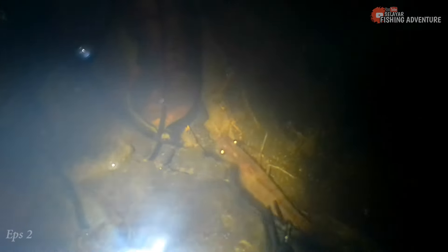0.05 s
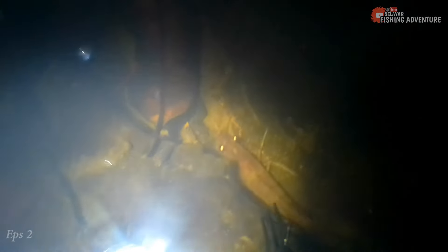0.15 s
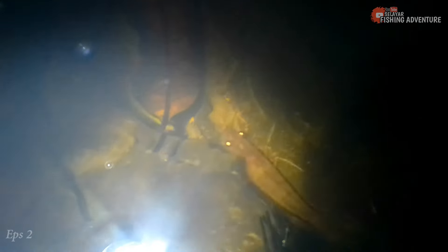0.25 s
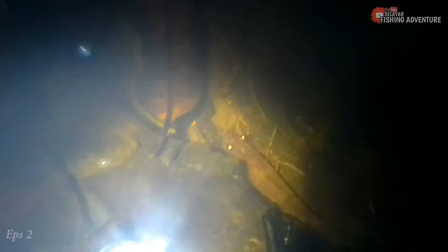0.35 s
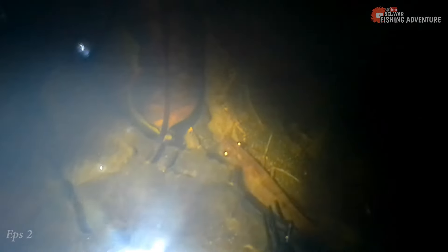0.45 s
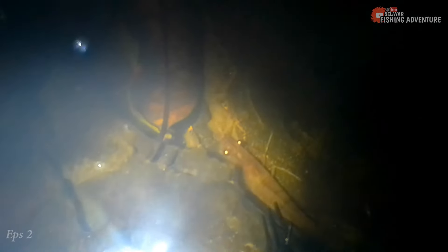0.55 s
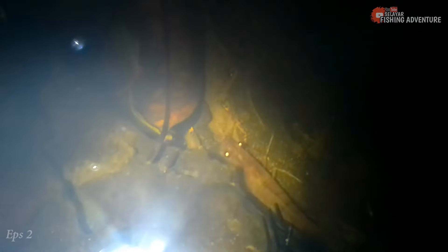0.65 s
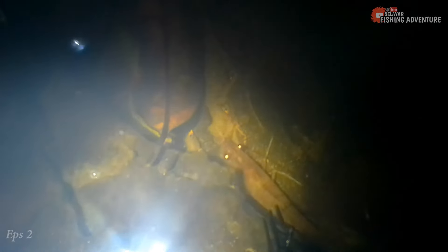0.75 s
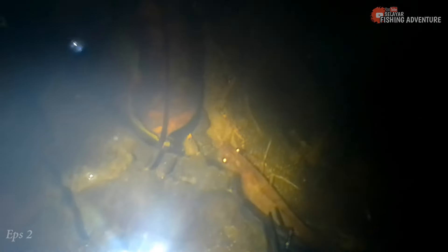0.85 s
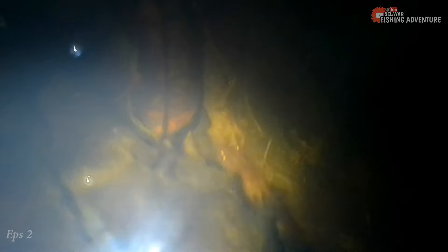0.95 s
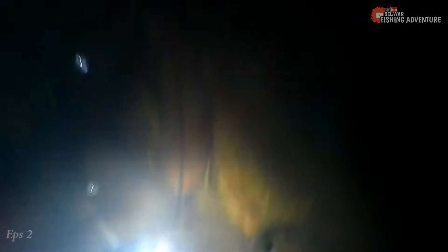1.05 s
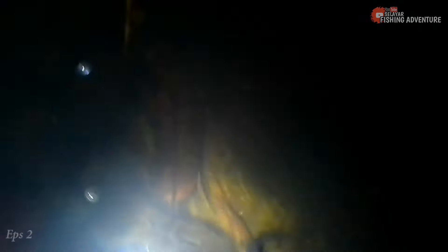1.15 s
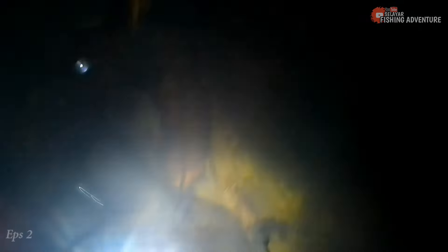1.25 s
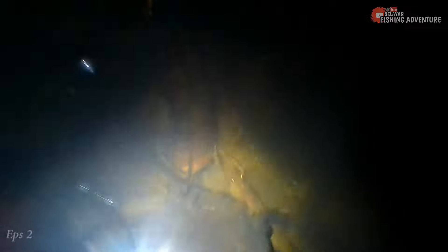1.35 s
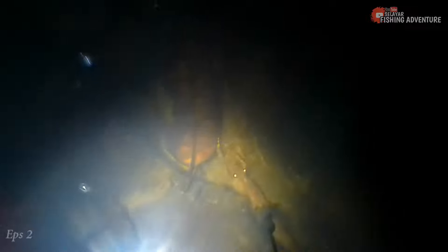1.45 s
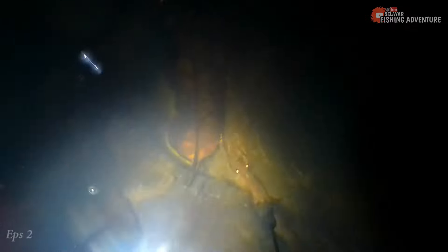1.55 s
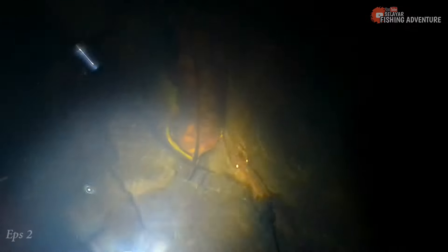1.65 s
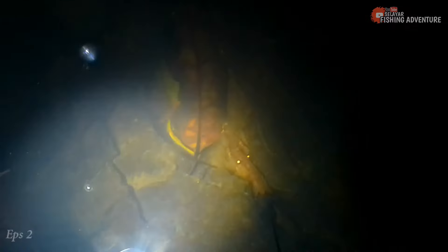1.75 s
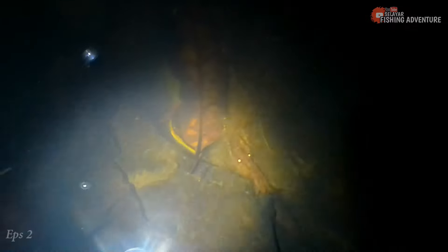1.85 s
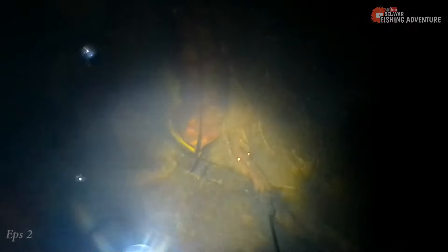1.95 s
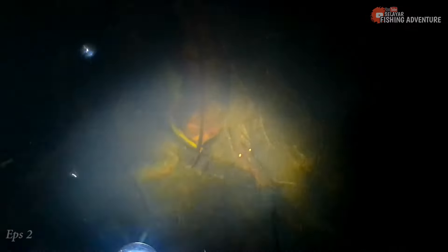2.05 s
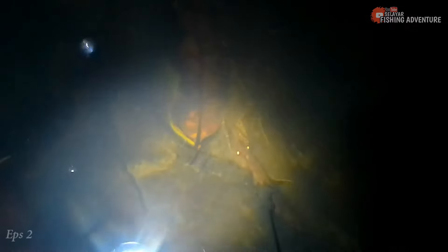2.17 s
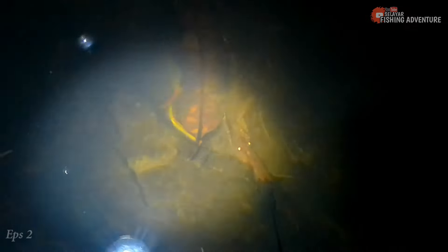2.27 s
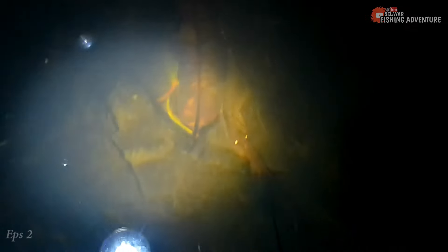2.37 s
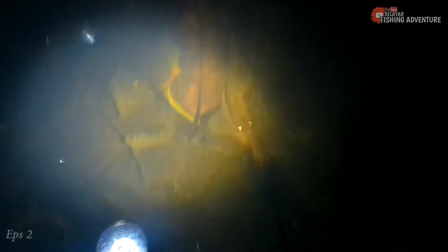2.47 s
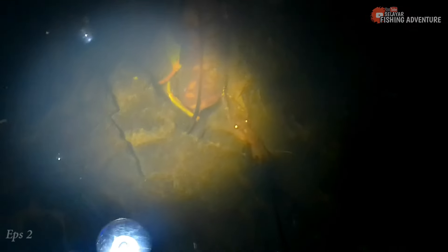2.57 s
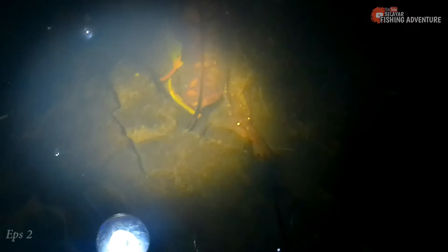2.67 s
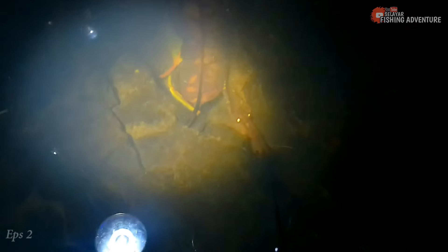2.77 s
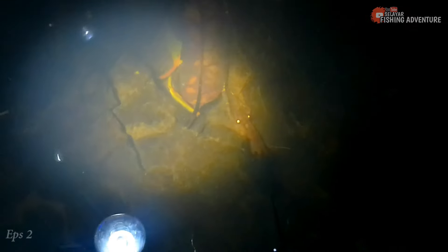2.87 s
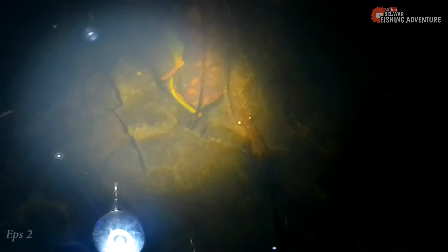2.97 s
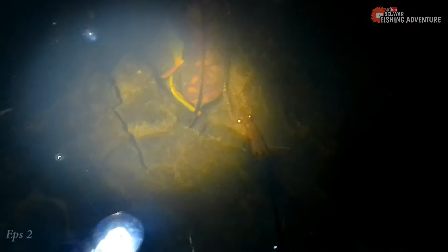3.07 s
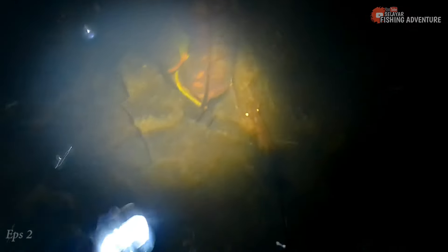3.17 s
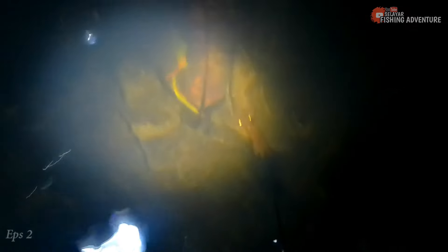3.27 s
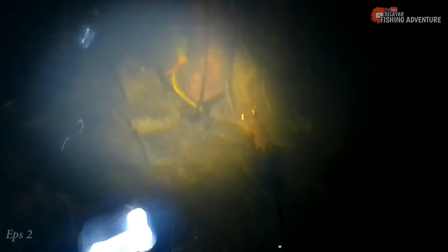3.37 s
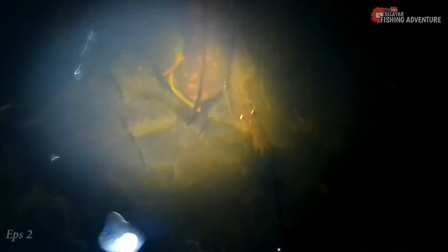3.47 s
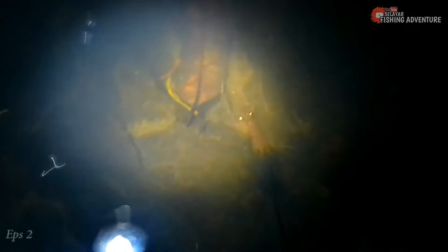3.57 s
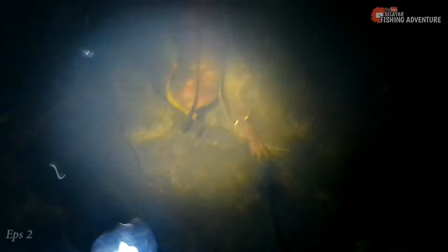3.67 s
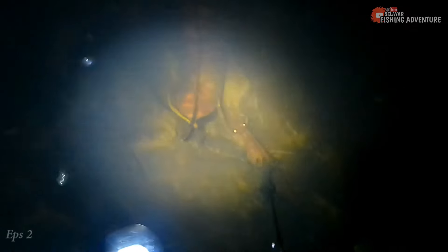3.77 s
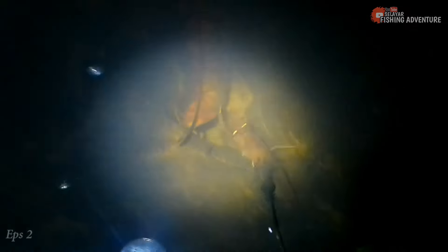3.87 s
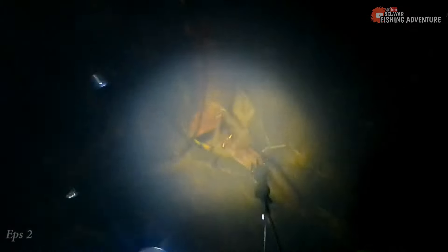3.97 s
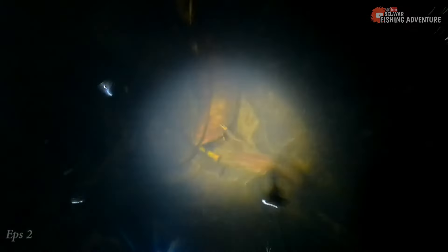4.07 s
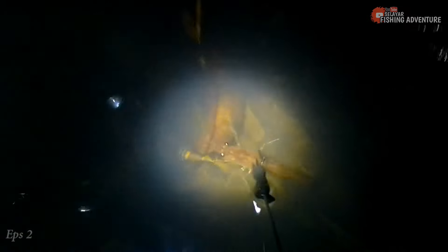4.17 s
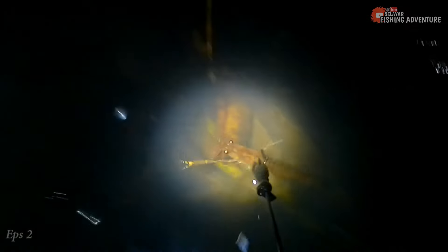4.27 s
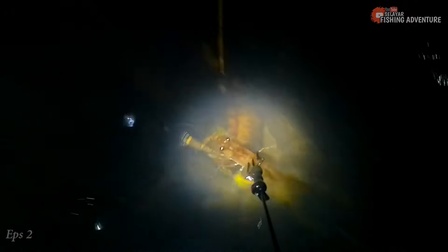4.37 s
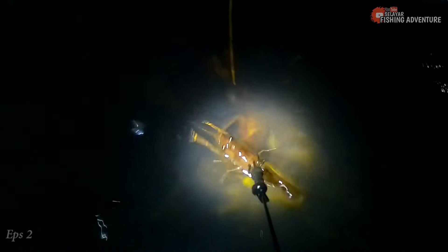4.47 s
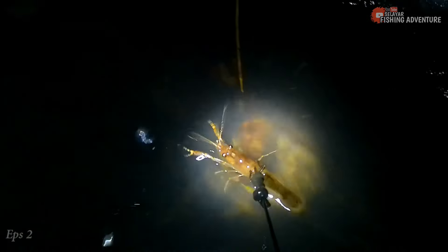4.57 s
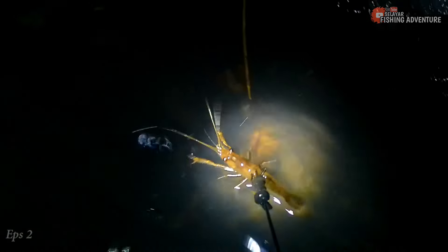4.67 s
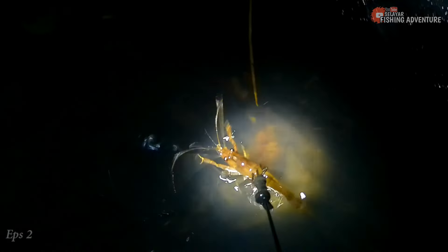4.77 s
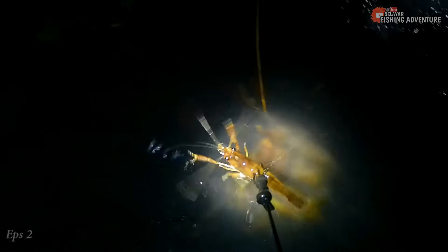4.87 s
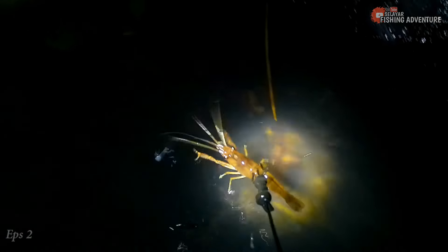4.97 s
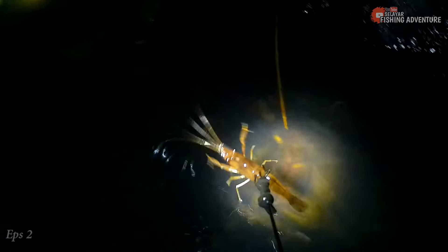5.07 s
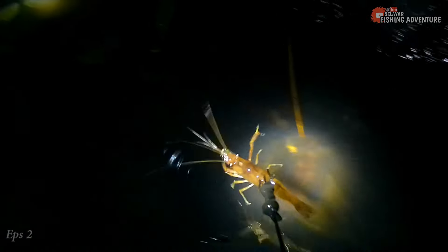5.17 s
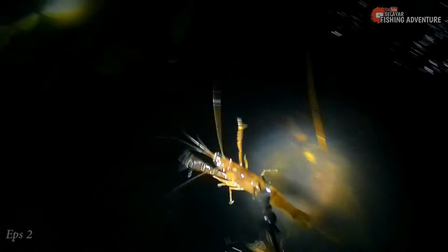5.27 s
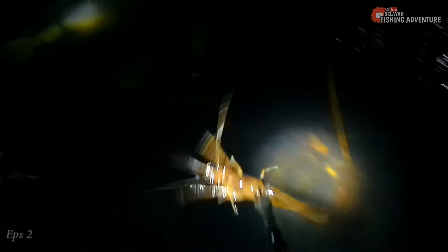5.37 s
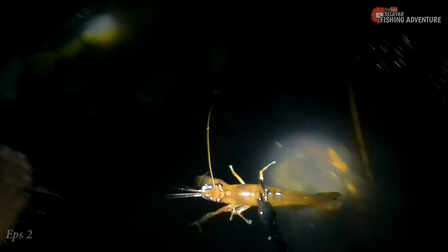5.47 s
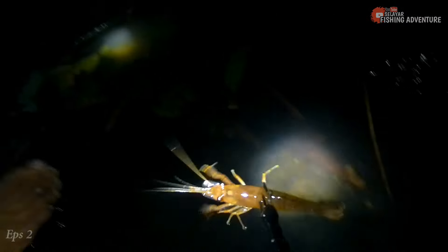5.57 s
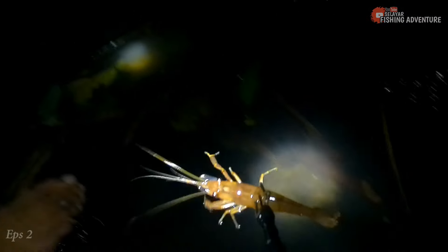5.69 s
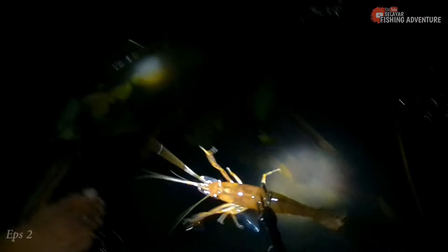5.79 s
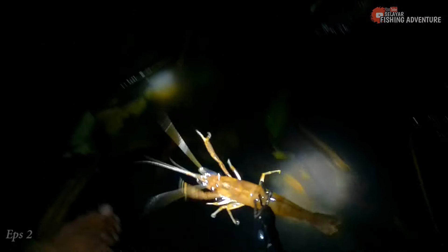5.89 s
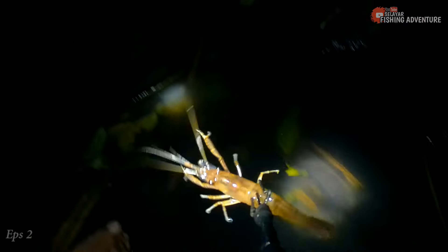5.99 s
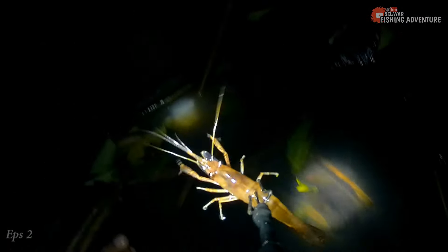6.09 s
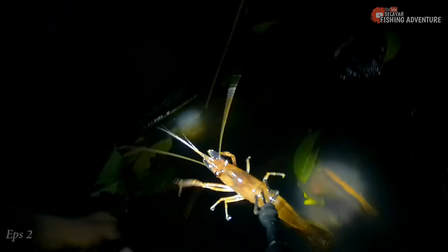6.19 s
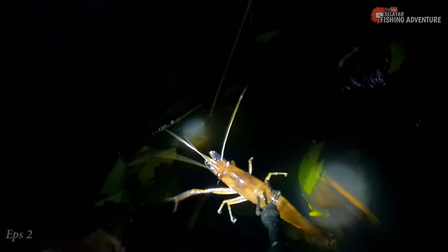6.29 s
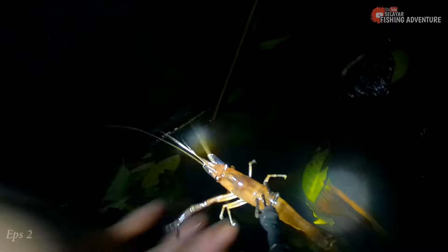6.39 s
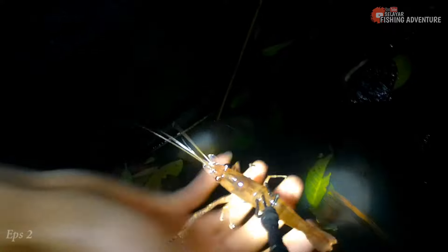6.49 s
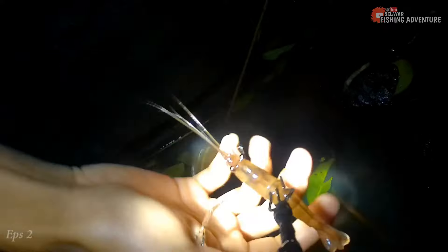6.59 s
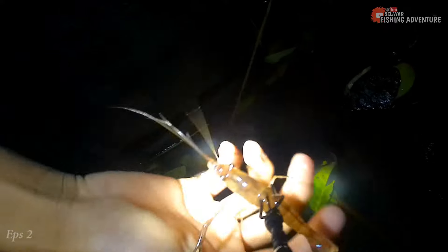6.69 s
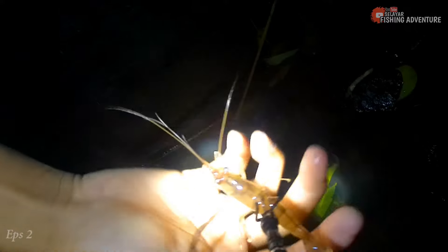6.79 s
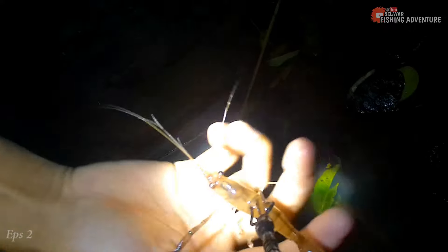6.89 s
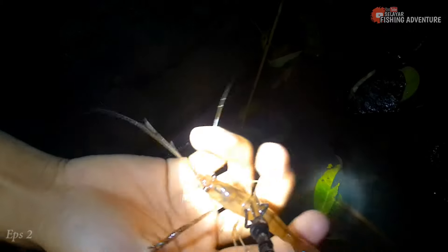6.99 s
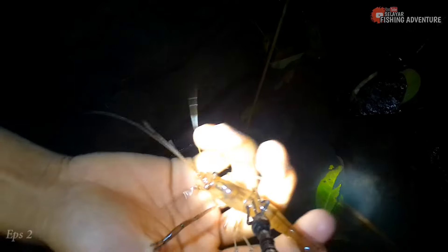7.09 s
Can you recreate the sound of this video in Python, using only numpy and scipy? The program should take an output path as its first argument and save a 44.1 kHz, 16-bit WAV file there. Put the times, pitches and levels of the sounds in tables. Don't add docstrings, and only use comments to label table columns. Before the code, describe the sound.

Night by a river, heard through a sealed plastic camera housing with the microphone inside. A couple of light hollow taps at 0.1 s, then a hush: very faint dull wash and tiny insect ticks about twenty a second. At 1.06 s a violent rattling knock, chattering for about 0.2 s, distorted, with a low thump. Soft sleeve rubbing from 1.4 to 1.8, small taps near 1.9, then a dense cluster of sharp knocks and rubs from 2.37 to 2.8 and more taps around 3.0. A second, duller rattling knock hits at 3.31 to 3.42. Lighter scrapes and isolated taps follow, clearest at 4.15, 4.23 and 5.09. A strong, gritty rub with hard clicks runs 5.2 to 5.6, then light taps near 5.8. Mostly ticks and a barely audible far squeak until 6.64, when a hard snap starts a flurry of finger taps to about 7.07.

```python
import sys
import numpy as np
from scipy import signal
from scipy.fft import rfft, irfft
from scipy.io import wavfile
from scipy.ndimage import uniform_filter1d

SR = 44100
rng = np.random.default_rng(int(sys.argv[2]) if len(sys.argv) > 2 else 0)


def store_wav(level_fs):
    pcm = np.round(np.clip(np.atleast_2d(level_fs), -1, 1) * 32767)
    wavfile.write(sys.argv[1], SR, pcm.T.astype(np.int16))


def invert_db(level):
    return 10 ** (np.asarray(level, dtype=float) / 20)


N = 314641

# f/Hz, width/Hz, level/dB
HOLLOW_MODES = [(377, 22, -3), (460, 45, -8), (540, 32, -3), (590, 55, -1), (655, 55, -5), (820, 70, -10)]
WALL_MODES = [(1100, 170, 1), (1230.4, 170, 2), (1480, 170, 4), (1744.4, 290, -1.5), (1946.8, 170, -0.5),
              (2404, 520, -20), (2750, 88, -23)]
EDGE_MODES = [(2300, 300, 9), (2680, 280, 8), (3200, 350, -6), (3750, 280, -2), (4250, 300, 0),
              (4720, 280, 0), (6400, 600, -15), (8700, 400, -35)]
# f/Hz, width/Hz, level/dB
THUD_MODES = [(125, 47, 0.0019), (223.53, 96, 0.0055)]

# start t/s, length/s, first level/dB, last level/dB, hollow above wall/dB
PALM_STROKES = [(.548, 0.0606, -70.5, -83, -6.5), (1.252, 0.02, -31.5, -50, -2),
                (1.27, 0.0379, -52, -54.5, 3.5), (1.31, .09, -64, -61, 4), (1.79, 0.06, -56, -80, 5),
                (1.94, .12, -59.5, -77.5, -0.5), (2.178, 0.1403, -58.5, -67.5, -6),
                (2.654, 0.0287, -30, -38, 0.5), (2.69, 0.0395, -62.5, -67.5, 3.5),
                (2.738, 0.0487, -36, -38, 1.5), (2.795, 0.0748, -43, -71.5, 1.5),
                (2.88, 0.0675, -70, -59, 1.5), (5.318, 0.065, -31, -33, -4), (5.385, .03, -36, -33, -3),
                (5.415, .04, -33, -32, -3), (5.457, 0.09, -32, -28, -4), (5.55, .075, -27.5, -43, -4.5),
                (5.686, 0.116, -78, -76, -5.5)]
FINGER_STROKES = [(.089, .006, -56, -48, -4), (.102, 0.0155, -37, -37, -6), (.12, 0.1564, -59, -97, 18),
                  (2.374, 0.0233, -41.5, -25.5, -3), (2.405, 0.0354, -46, -50, 0),
                  (2.448, 0.0843, -39, -42.5, -4), (2.548, 0.0347, -29, -31, -7),
                  (2.595, 0.0188, -36, -39.5, 5), (2.625, 0.0193, -35, -46.5, 5.5),
                  (3.07, 0.0218, -54, -55.5, 2), (3.15, 0.086, -57, -67, -10),
                  (2.958, 0.0213, -40, -48, -5.5), (3.005, 0.0593, -39.5, -59, 0),
                  (3.095, 0.0483, -42.5, -36, -2), (3.22, 0.089, -72, -46, -16),
                  (3.42, .03, -48, -51.5, -3), (3.454, 0.1303, -43, -49.5, 6),
                  (3.595, .14, -64.5, -60.5, 8), (3.75, 0.038, -57, -51, 3), (3.802, 0.0846, -41, -57, 3.5),
                  (3.914, .015, -57, -60, 5), (3.94, 0.112, -72, -60, 9), (4.146, .009, -56, -42, -8),
                  (4.224, .009, -58, -44, -8), (4.062, 0.00806, -36, -34, 0), (4.4, 0.135, -70, -69, 0),
                  (4.628, .032, -52, -56, 4), (4.996, 0.01225, -44, -46.5, 4.5),
                  (5.03, 0.0743, -44, -35.5, 0.5), (4.16, .02, -27, -45.5, -6),
                  (5.805, 0.128, -45.5, -45.5, -3.5)]
THUMB_STROKES = [(5.213, 0.1, -40, -32, -3), (6.781, 0.011, -39, -26, -15), (6.83, .008, -58, -42, -10),
                 (6.895, 0.0348, -37, -32, -8), (6.956, 0.062, -56, -67, -3), (7.053, 0.01, -40, -40, -5),
                 (7.066, 0.011, -39, -36, -5)]
SLEEVE_STROKES = [(1.408, .075, -51, -49, 4), (1.485, .065, -51, -58, 5), (1.56, .14, -56, -49, 4),
                  (1.715, .072, -51, -49, 4)]
PALM_GRIT_DB, FINGER_GRIT_DB, THUMB_GRIT_DB, SLEEVE_GRIT_DB = -18, -26.5, -32, -11
GRIT_GROWTH = .15
LAND_DB_PER_S, LIFT_DB_PER_S, HOLLOW_LIFT_DB_PER_S = 4000, 1500, 800

# t/s, peak level/dB, hollow above peak/dB, ring f/Hz
NAIL_TAPS = [(1.8347, -49, 1, 1347), (2.396, -10.5, -7.5, 1350), (2.618, -.5, -13.5, 1480),
             (3.001, -37.5, 10, 1310), (3.021, -21.5, -7, 1240), (5.3183, -6, -16.5, 1607),
             (5.3244, -11, -23, 1235), (5.4306, -17, -17, 1626), (5.5079, -15, -18.5, 1454),
             (5.547, -18, -17, 1498), (6.6455, -9, -25, 1250), (6.9561, -30, -2.5, 1850)]
TIP_TAPS = [(.0975, -20, -4, 567.6), (.1114, -26, -4.5, 1766), (1.924, -15, -4.5, 1364),
            (2.4947, -27, -23, 1572), (2.5157, -31, -18.5, 1650), (2.593, -18.5, -20, 1460),
            (2.6524, -13.5, -7, 1631), (3.1078, -30, -10.5, 1700), (3.1358, -28.5, -7, 1550),
            (5.8145, -30, -15, 1501), (5.848, -35, -12, 1700), (5.926, -34, -12.5, 1150),
            (3.584, -39, -13.5, 1600), (3.818, -32, -5, 1352), (3.9224, -49, 15, 1287),
            (4.1545, -14, -11, 1464), (4.6334, -34.5, -4, 1427), (5.0489, -30.5, -8.5, 1400),
            (5.0908, -17, -11.5, 1100), (6.1975, -26, -23.5, 1621), (6.2052, -27, -14.5, 1497),
            (6.638, -10, -14, 1426), (6.6604, -38, -10, 1400), (6.8997, -25, -12.5, 1518),
            (6.9127, -13.5, -15.5, 1453), (6.9262, -12.5, -15, 1592), (6.9844, -38.5, -10.5, 1540),
            (7.0394, -28, -12, 1516)]
PAD_TAPS = [(.1381, -35, 2.5, 1707), (1.9076, -45.5, 6, 1276), (2.5356, -19.5, -12, 1256),
            (2.575, -14.5, -11, 1190), (3.5493, -28.5, 3.5, 1442), (4.0602, -31, 1.5, 1256),
            (4.2338, -15, -11, 1223), (4.6643, -27.5, -1, 1604), (6.6822, -13, -28, 1281),
            (6.775, -21.5, -20, 1352), (6.7915, -11.5, -22, 1450), (6.8384, -9, -14.5, 1493),
            (6.8655, -31.5, -12.5, 1410), (6.9688, -29, -22, 1650), (7.007, -37, -19, 1639),
            (6.855, -42, -5.5, 1400)]
SKIN_CATCHES = [(5.256, -25, -10, 1570), (5.274, -24, -10, 1490), (5.304, -20, -10, 1150),
                (5.3295, -17, -18, 1400), (5.42, -23, -14, 1680), (5.4365, -17, -14, 1500),
                (5.447, -19, -14, 1450), (5.465, -20, -12, 1370), (5.483, -20, -12, 1380),
                (5.493, -19, -14, 1570), (5.521, -19, -14, 1400), (5.534, -17, -14, 1310),
                (5.6, -27, -10, 1180)]
# edge above peak/dB, press time/ms
NAIL_TOUCH, TIP_TOUCH, PAD_TOUCH = (-20.5, 0.939), (-38, 1.042), (-48, 1.3)
CATCH_TOUCH = (-30, 1.1)

# t/s, level/dB, held/s, time
# to lose 60 dB/s, hollow above level/dB
KNOCK_BLOWS = [(1.0644, 11, 0.03334, 0.0244, -9), (1.104, 1, 0.0089, 0.065, -12),
               (1.1195, 8, 0.0161, 0.03, -10), (1.141, -8, 0.0034, .03, -10), (1.15, -4, 0.0115, .04, -5),
               (1.1645, 7, 0.00534, .025, -9), (1.174, -12, 0.012, 0.029, 2.5),
               (1.2035, -1.5, 0.00182, .03, -10), (1.243, -5, 0.00095, .016, -9.5),
               (1.214, -20, 0.0105, 0.09, -4), (2.372, -38, 0.0368, 0.069, 17.5),
               (3.31, -10, .002, 0.02, -18), (3.3176, 1, 0.002, 0.009, -8), (3.3222, 8.5, 0.0105, .02, -2),
               (3.337, 6, 0.0061, 0.029, -9), (3.3494, 5, 0.0089, 0.02, -19.5),
               (3.363, -4, 0.0037, 0.028, -13), (3.372, -1, 0.00667, 0.0118, -13.5),
               (3.383, -18, 0.0132, 0.037, -2.5), (3.4022, -8, 0.006, .02, -10),
               (3.411, -6.5, 0.005, .014, -10)]
# t/s, f/Hz
GRIP_PATHS = [
    [(1.064, 1299), (1.078, 1149), (1.086, 1655), (1.105, 1591), (1.115, 1845), (1.126, 1506),
     (1.146, 1751), (1.17, 1300), (1.21, 1650)],
    [(1.243, 1100), (3.31, 1744), (3.33, 1526), (3.345, 1400), (3.355, 1677), (3.38, 1603), (3.402, 1199),
     (3.42, 1244)],
]
# t/s, peak level/dB, f/Hz, time to lose 60 dB/s
AIR_HUMS = [(.1, -30, 454.8, 0.195), (.1, -35.5, 373.2, 0.253), (1.925, -28, 610, 0.0689),
            (2.622, -21.5, 599, 0.106), (3.003, -26.5, 551.3, 0.0866), (3.133, -28, 379.9, 0.108),
            (3.548, -35, 559.3, .08), (3.925, -47, 380, .2), (4.02, -41.5, 380.2, 0.211),
            (4.158, -39, 366.6, 0.165), (4.236, -39, 389.5, 0.1145), (4.666, -33, 388.3, 0.095),
            (5.092, -33, 390.2, 0.0997), (6.957, -38, 558, 0.094)]
# t/s, peak level/dB, f/Hz, length/s
HARD_SNAPS = [(.0975, -15, 560, .0026), (3.4045, -1, 1240, .002), (3.4092, -1.5, 1370, .0018),
              (6.6433, .3, 1420, .0011)]
# t/s, level/dB, f/Hz, time to lose 60 dB/s
TINY_PING = (6.644, -54, 11000, .02)
# start t/s, length/s, level/dB, f/Hz
LIGHT_RASPS = [(3.25, .065, -50, 1230), (3.745, .055, -51, 1600), (3.965, .085, -60, 1150),
               (4.41, .12, -68, 1150), (4.46, .085, -67, 2000)]
RASP_WIDTH_HZ = 170

# widest swing t/s, level/dB, time to gain 60 dB/s, time to lose 60 dB/s, swing f/Hz
MOUNT_JOLTS = [(.108, -24.5, 0.04, 0.15, 54.74), (1.074, -13, 0.0268, .5, 74), (1.11, -13, 0.06, .5, 40),
               (1.186, -14, .14, 0.4253, 45), (1.5, -32.5, 0.7647, 0.28, 60), (1.682, -37, 0.12, .2, 53.97),
               (1.776, -25.5, 0.18, 0.2272, 68), (1.935, -32.5, 0.09, 0.3443, 51.92),
               (2.2, -54, 0.1, 1.12, 46), (2.415, -28.5, 0.1277, 0.26, 50.2), (2.599, -35, 0.26, 0.24, 43),
               (2.787, -29.5, 0.19, 0.1744, 39.99), (3.02, -47, 0.37, 0.63, 63),
               (3.157, -34, 0.43, 0.01, 50.99), (3.34, -29.5, .25, .5, 44.93),
               (3.435, -18.5, 0.2947, 0.1265, 41.07), (3.655, -43, 0.21, 0.28, 49),
               (3.8, -49.5, 0.04, 0.33, 55), (3.935, -33, 0.0929, 0.2655, 49),
               (4.09, -43, 0.13, 0.2, 53.03), (4.195, -23, 0.0574, 0.0774, 53.87),
               (5.03, -54, 0.18, 0.08, 50), (5.11, -36.5, 0.1335, 0.1431, 66.03),
               (5.4, -35, 0.4239, 0.62, 37), (5.46, -32.5, 0.3273, 0.28, 49.97),
               (5.55, -31.5, 0.44, 0.23, 67), (5.832, -37.5, 0.06, 0.19, 49.99),
               (5.91, -33.5, 0.19, 0.2131, 43), (6.645, -58, 0.23, 0.34, 100), (6.86, -61.5, .5, 1, 65),
               (4.32, -57, .2, .35, 50)]
# t/s, level/dB
CURRENT_TUG = [(0, -72), (.8, -72), (1, -67), (2.1, -72), (4.3, -68), (4.82, -70), (4.86, -78), (4.98, -78),
               (5.7, -70), (6.0, -71), (6.3, -74), (6.59, -75), (7.14, -77.5)]

# t/s, level/dB
INSECT_TICKS = [(.032, -62.5), (.183, -72.5), (.231, -64.5), (.2924, -61.5), (.3594, -60), (.4107, -66.5),
                (.452, -67.5), (.5023, -62), (.5487, -62.5), (.6042, -68), (.6671, -62), (.7317, -62.5),
                (.7714, -61.5), (.8381, -61.5), (.9059, -62.5), (.957, -63.5), (1.0123, -64), (6.0092, -67),
                (6.07, -73), (6.115, -67), (6.166, -72), (6.178, -63), (5.128, -70), (6.2443, -62.5),
                (6.2909, -65), (6.3451, -67.5), (6.4087, -62.5), (6.4553, -62), (6.5077, -65.5),
                (6.5543, -68), (6.604, -68.5), (6.7356, -64), (7.0195, -63), (7.1284, -71.5),
                (1.3072, -59), (1.3606, -57), (1.413, -61), (1.4584, -58), (1.5068, -60), (1.5666, -60),
              (1.62, -61), (1.856, -60), (1.9612, -62), (2.0116, -61), (2.068, -70), (2.1104, -66),
              (2.1633, -62), (2.2216, -62), (2.2805, -61), (2.3339, -66), (4.3217, -63), (4.3816, -73),
              (4.427, -64), (4.4773, -64), (4.5322, -60), (4.5841, -65), (4.7028, -64), (4.7522, -66),
              (4.8116, -65), (4.8545, -70), (4.9373, -66), (4.868, -67), (3.632, -64), (3.68, -66),
              (3.721, -66), (3.762, -64), (3.906, -67), (3.966, -63), (4.021, -67), (4.131, -68),
              (4.269, -65), (.0235, -70), (.281, -70), (.6555, -71), (.7665, -72)]
# first t/s, last t/s, gap/s, level/dB
TICK_RUNS = [(2.703, 2.94, .073, -62), (3.181, 3.24, .046, -67), (5.172, 5.2, .055, -64.5),
             (5.644, 5.8, .066, -75)]
TICK_SLOP_S, TICK_SPREAD_DB = .004, 3
# t/s, length/s, level/dB, f/Hz
FAR_SQUEAK = (6.47, .05, -66, 1400)
# f/Hz, level/dB per Hz
WASH_SPECTRUM = [(20, -93), (65, -106), (120, -104), (210, -108), (400, -114), (1300, -115), (2900, -133),
                 (4200, -129), (16000, -137)]

OFFSET, LOPSIDED = .0005, .045


def evened(x):
    return x / np.sqrt(np.mean(x ** 2) + 1e-30)


def peaked(x):
    return x / (abs(x).max() + 1e-30)


def add(mix, s, sound):
    part = mix[round(s * SR):][:len(sound)]
    part += sound[:len(part)]


def dulled(x, hz=5200):
    return signal.sosfilt(signal.butter(6, min(hz, 9000), fs=SR, output="sos"), x)


def resonate(x, hz, width):
    pole = np.exp((2j * np.pi * hz - np.pi * 1.55 * width) / SR)
    for _ in range(2):
        x = signal.lfilter([1 - abs(pole)], [1, -pole], x)
    return 2 * x.real


def ring(x, modes):
    return sum((-1) ** k * invert_db(db) * resonate(x, hz, width) for k, (hz, width, db) in enumerate(modes))


def wandering(x, modes, lumpy_db):
    coarse = rng.standard_normal((len(modes), len(x) // 50 + 1))
    coarse = uniform_filter1d(uniform_filter1d(coarse, size=10), size=10)
    lumps = uniform_filter1d(np.repeat(coarse, 50, axis=1)[:, :len(x)], size=50)
    out = np.zeros(len(x))
    for k, (mode, lump) in enumerate(zip(modes, lumps)):
        out += (-1) ** k * invert_db(lumpy_db * evened(lump)) * ring(x, [mode])
    return out


def sliding(x, hz, width):
    turn = np.exp(2j * np.pi * np.cumsum(hz) / SR)
    r = np.exp(-np.pi * width / SR)
    return 2 * (turn * signal.lfilter([(1 - r) ** 2], [1, -2 * r, r * r], x / turn)).real


def slips(size, per_s, spread_db, smooth):
    draw = rng.random((size, 2))
    strength = invert_db(spread_db * np.minimum(-np.log(draw[:, 0] + 1e-12), 4))
    slip = strength * (draw[:, 1] < per_s / SR)
    burst = signal.lfilter([1], [1, -.97], slip)
    return rng.standard_normal(size) * (smooth + evened(burst))


def rubs():
    drive = dulled(slips(N, per_s=300, spread_db=-1.0, smooth=0.7), 6100)
    wall = evened(dulled(wandering(drive, WALL_MODES, lumpy_db=3.5), 2800))
    hollow = evened(dulled(wandering(drive, HOLLOW_MODES, lumpy_db=3.5), 2800))
    hiss = dulled(slips(N, per_s=470, spread_db=2.5, smooth=2.5), 8800)
    edge = evened(wandering(hiss, EDGE_MODES, lumpy_db=4.0))
    out = np.zeros(N)
    for strokes, grit_db in ((PALM_STROKES, PALM_GRIT_DB), (FINGER_STROKES, FINGER_GRIT_DB),
                             (THUMB_STROKES, THUMB_GRIT_DB), (SLEEVE_STROKES, SLEEVE_GRIT_DB)):
        for s, length, first_db, last_db, hollow_db in strokes:
            span = slice(round((s - .04) * SR), round((s + length + .1) * SR))
            t = np.arange(N)[span] / SR - s
            level_db = np.interp(t, [0, length], [first_db, last_db]) + LAND_DB_PER_S * np.minimum(t, 0)
            lifted = np.maximum(t - length, 0)
            grit = invert_db(grit_db + GRIT_GROWTH * (level_db + 32)) * edge[span]
            out[span] += invert_db(level_db - LIFT_DB_PER_S * lifted) * (wall[span] + grit)
            out[span] += invert_db(level_db + hollow_db - HOLLOW_LIFT_DB_PER_S * lifted) * hollow[span]
    return out


def tap(db, hollow_db, hz, edge_db, press_ms):
    t = np.arange(4000) / SR - .01
    held_hollow = [(f, 2.233 * width, d) for f, width, d in HOLLOW_MODES[1:]]
    held_wall = [(f, 1.345 * width, d) for f, width, d in WALL_MODES]
    u = np.maximum(t, 0) / (max(press_ms, .3) / 1000)
    press = u ** 2 * np.exp(-u)
    scuff = invert_db(-27) * np.exp(-abs(t - .002) / np.where(t < .002, .0026, .0035))
    push = dulled(rng.standard_normal(len(t)) * (press + scuff))
    patch = peaked(resonate(press * np.sin(2 * np.pi * hz * t), hz, 420))
    wall = peaked(patch + 0.846 * peaked(ring(push, held_wall)))
    hollow = invert_db(hollow_db) * peaked(ring(push, held_hollow))
    thud = invert_db(-34.5) * peaked(ring(push, THUD_MODES))
    edge = peaked(ring(push * np.exp(-abs(t) / 0.0029), EDGE_MODES[1:]))
    return invert_db(db) * (dulled(wall + hollow + thud, 2350) + invert_db(edge_db) * edge)


def taps():
    out = np.zeros(N)
    for rows, (edge_db, press_ms) in ((NAIL_TAPS, NAIL_TOUCH), (TIP_TAPS, TIP_TOUCH),
                                      (PAD_TAPS, PAD_TOUCH), (SKIN_CATCHES, CATCH_TOUCH)):
        for s, db, hollow_db, hz in rows:
            add(out, s - .0115 - press_ms / 1000, tap(db, hollow_db, hz, edge_db, press_ms))
    return out


def knocks():
    out, t, grip = np.zeros(N), np.arange(9000) / SR, np.vstack(GRIP_PATHS).T
    for s, db, held, t60, hollow_db in KNOCK_BLOWS:
        force = invert_db(-60 * np.maximum(t - held, 0) / t60) * np.minimum(t / 0.00046, 1)
        chatter = dulled(force * slips(len(t), per_s=1900, spread_db=0.5, smooth=0.72))
        patch = peaked(sliding(chatter, np.interp(s + t, *grip), width=340))
        bright = peaked(ring(chatter, [(1980, 200, 3), (2650, 400, -7)]))
        bright_db = -9 - 6 * (s > 3)
        wall = peaked(patch + .75 * peaked(ring(chatter, WALL_MODES)) + invert_db(bright_db) * bright)
        hollow = peaked(ring(chatter, HOLLOW_MODES)) + invert_db(-10) * peaked(ring(chatter, THUD_MODES))
        edge = peaked(ring(chatter, EDGE_MODES[2:]))
        add(out, s - .001, invert_db(db + 1.2) * (wall + invert_db(hollow_db - 0.75) * hollow + invert_db(-21) * edge))
    return out


def hums():
    out, t = np.zeros(N), np.arange(9000) / SR
    for s, db, hz, t60 in AIR_HUMS:
        tremble = evened(resonate(rng.standard_normal(len(t)), hz, 60))
        tone = np.sin(2 * np.pi * hz * t) + 0.41 * tremble
        add(out, s, invert_db(db - 60 * t / t60) * np.minimum(t / 0.0032, 1) * tone)
    return out


def snaps():
    out, t = np.zeros(N), np.arange(-600, 600) / SR
    for s, db, hz, length in HARD_SNAPS:
        add(out, s + t[0], invert_db(db) * np.exp(-(t / length) ** 2) * np.cos(2 * np.pi * hz * t))
    s, db, hz, t60 = TINY_PING
    t = t[t >= 0]
    add(out, s, invert_db(db - 60 * t / t60) * np.sin(2 * np.pi * hz * t))
    return out


def rasps():
    out = np.zeros(N)
    for s, length, db, hz in LIGHT_RASPS:
        grit = rng.standard_normal(8000)
        scrape = evened(resonate(grit, hz, RASP_WIDTH_HZ))[:round(length * SR)]
        add(out, s, invert_db(db) * signal.windows.tukey(len(scrape), .6) * scrape)
    return out


def sway():
    t = np.arange(0, N, 20) / SR
    level_db, swing = np.full(len(t), -95.), np.zeros(len(t))
    for s, db, rise, fall, hz in MOUNT_JOLTS:
        jolt_db = uniform_filter1d(db - 60 * np.maximum((s - t) / rise, (t - s) / fall), size=20)
        swing += invert_db(jolt_db + 1) * np.sin(2 * np.pi * (hz * t + rng.random()))
        level_db = np.maximum(level_db, jolt_db)
    rest_db = np.interp(t, *np.transpose(CURRENT_TUG))
    level_db, swing, rest_db = (np.interp(np.arange(N) / SR, t, v) for v in (level_db, swing, rest_db))
    shake, stir = rng.standard_normal((2, N))
    rumble = invert_db(level_db - 3) * evened(ring(shake, [(42, 20, 0), (66.8, 25, -1), (90.5, 30, -4)]))
    thump = invert_db(.9 * level_db - 23) * evened(ring(stir, THUD_MODES))
    tug = invert_db(rest_db) * evened(ring(stir, [(43, 15, 0), (85.01, 40, -11)]))
    return swing + rumble + thump + tug


def insects():
    runs = np.array([(s, db) for first, last, gap, db in TICK_RUNS for s in np.arange(first, last, gap)])
    runs = runs + rng.standard_normal(runs.shape) * (TICK_SLOP_S, TICK_SPREAD_DB)
    out, t = np.zeros(N), np.arange(1500) / SR
    for s, db in np.vstack([INSECT_TICKS, runs]):
        bend, grit = rng.standard_normal(), rng.standard_normal(len(t))
        tone = peaked(t * np.exp(-t / .0013)) * np.sin(2 * np.pi * 2230 * (1 + .025 * bend) * t)
        overtone = peaked(t * np.exp(-t / .0025)) * evened(resonate(grit, 4400, 220))
        overtone *= invert_db(-82 - db)
        tail = invert_db(-13 + 3 * bend) * np.exp(-t / .009) * evened(resonate(grit, 2350, 450))
        click = invert_db(-13) * np.exp(-t / .002) * evened(dulled(grit, 4600))
        add(out, s - .002, invert_db(db + 4) * (tone + overtone + tail + click))
    s, length, db, hz = FAR_SQUEAK
    t = np.arange(round(length * SR)) / SR
    flutter = signal.windows.tukey(len(t), .4) * (.6 + .4 * np.cos(2 * np.pi * 90 * t))
    voice = np.sin(2 * np.pi * hz * t) + .3 * np.sin(6 * np.pi * hz * t) + .3 * np.sin(2 * np.pi * 5300 * t)
    add(out, s, invert_db(db) * flutter * voice)
    return out


def river_wash():
    hz, db = np.transpose(WASH_SPECTRUM)
    shape = invert_db(np.interp(np.log(np.fft.rfftfreq(N, 1 / SR) + 1), np.log(hz), db))
    return irfft(rfft(rng.standard_normal(N)) * shape, N) * np.sqrt(SR / 2)


def scene():
    touches = rubs() + taps() + hums() + rasps()
    touches = signal.sosfilt(signal.butter(2, 185, "high", fs=SR, output="sos"), touches)
    return (touches + knocks() + snaps() + sway() + insects() + river_wash())[None]


def band_limit(x):
    return signal.sosfilt(signal.butter(12, 16640, fs=SR, output="sos"), x)


def record(dry):
    limit, knee = .69, 14.0
    x = dry / (1 + abs(dry / limit) ** knee) ** (1 / knee)
    x = x + OFFSET + LOPSIDED * uniform_filter1d(abs(x), size=2000, axis=1)
    treble_cut = signal.firwin(255, 15700, window=("kaiser", 8), fs=SR)
    x = signal.oaconvolve(x, treble_cut[None], "same")
    return band_limit(x)


dry = scene()
out = record(dry)
store_wav(out)
```